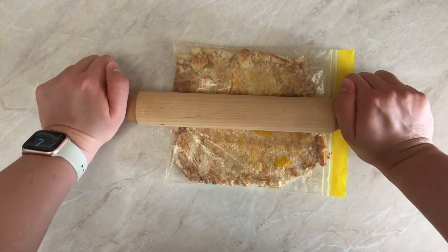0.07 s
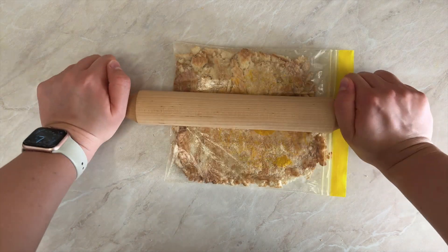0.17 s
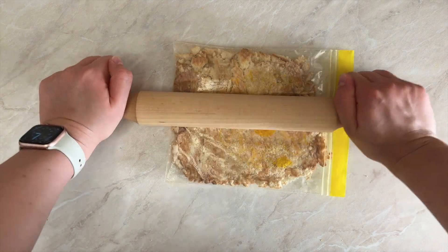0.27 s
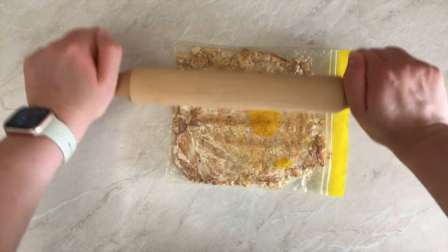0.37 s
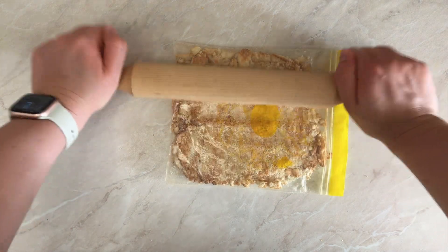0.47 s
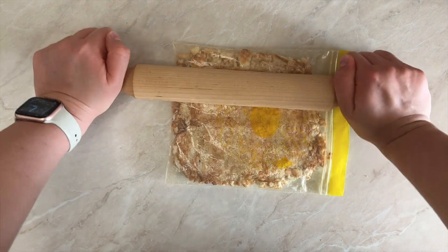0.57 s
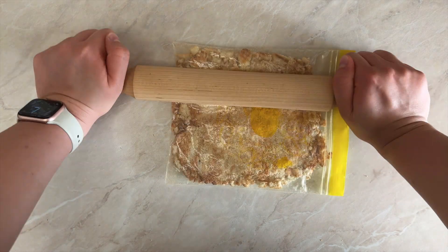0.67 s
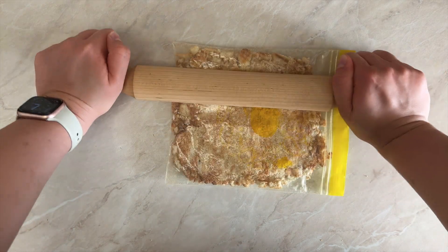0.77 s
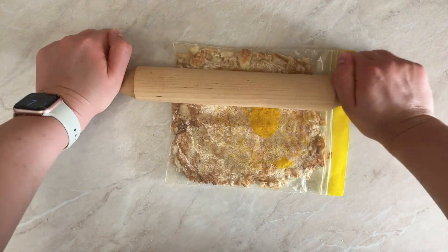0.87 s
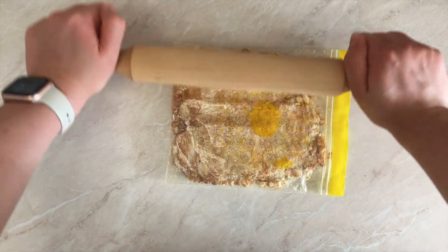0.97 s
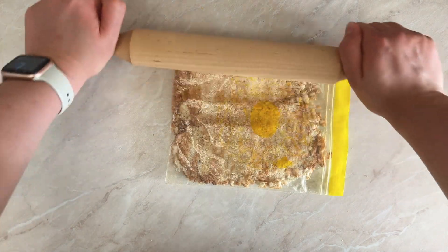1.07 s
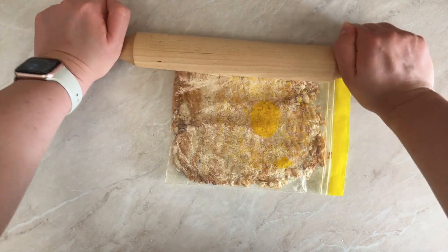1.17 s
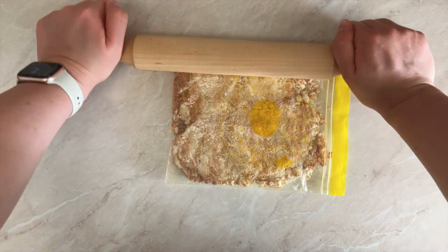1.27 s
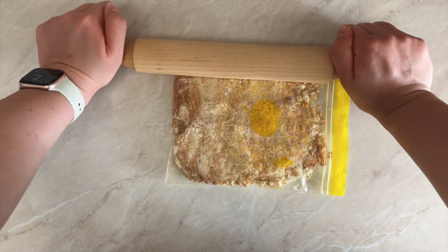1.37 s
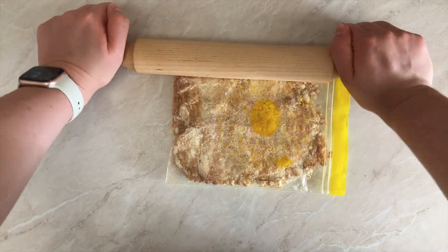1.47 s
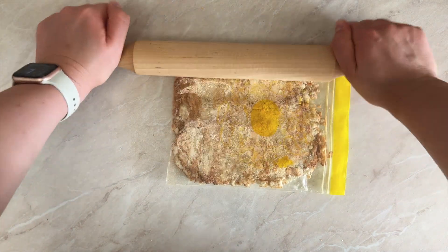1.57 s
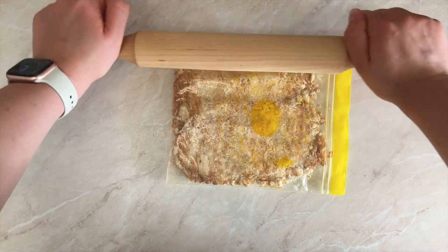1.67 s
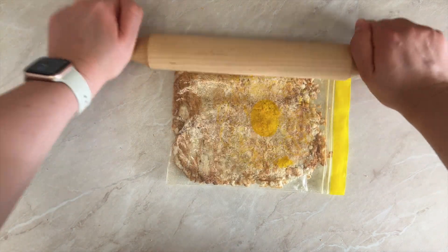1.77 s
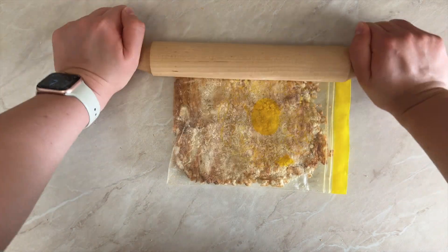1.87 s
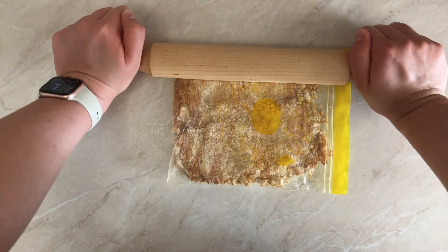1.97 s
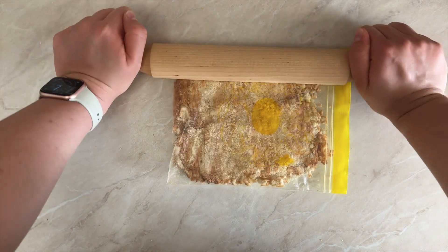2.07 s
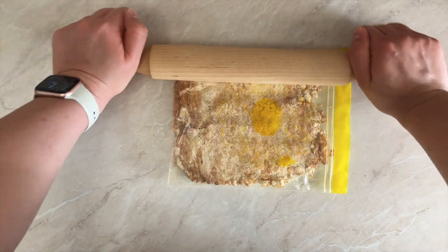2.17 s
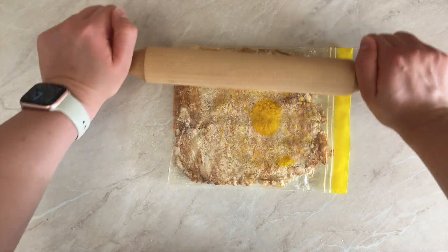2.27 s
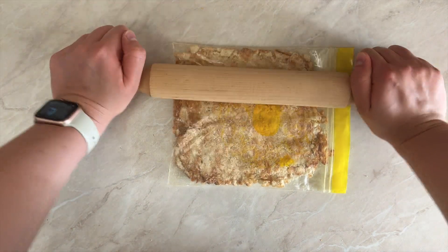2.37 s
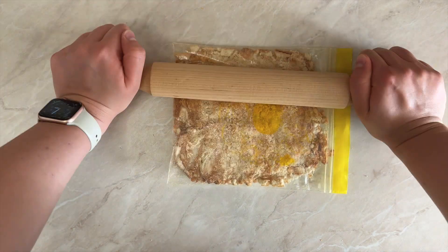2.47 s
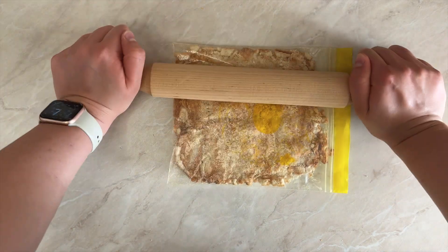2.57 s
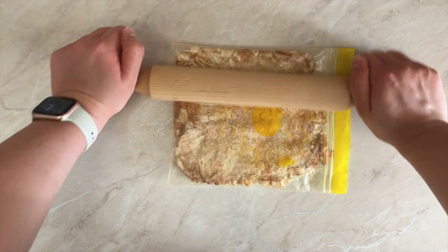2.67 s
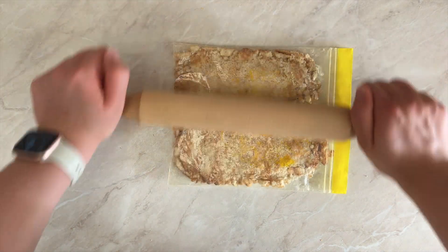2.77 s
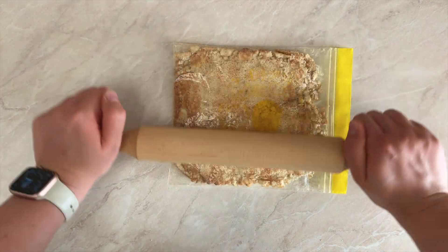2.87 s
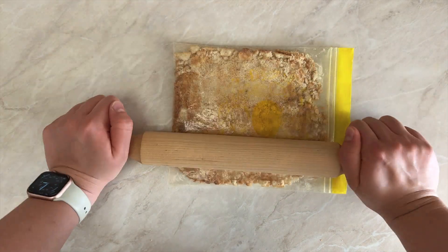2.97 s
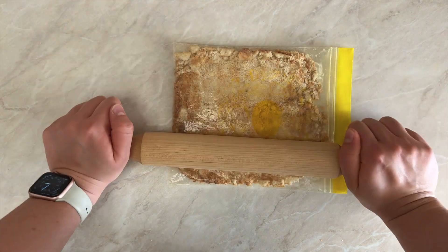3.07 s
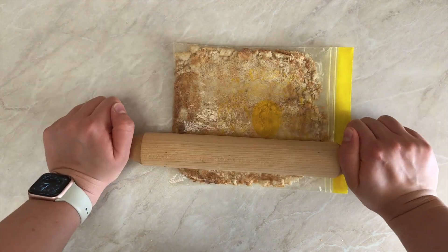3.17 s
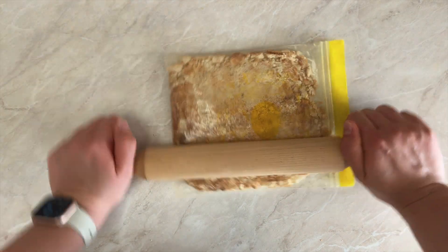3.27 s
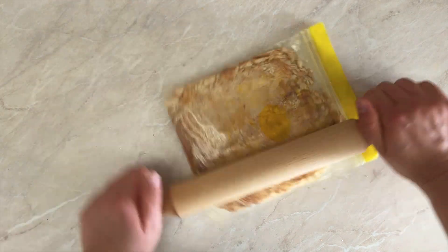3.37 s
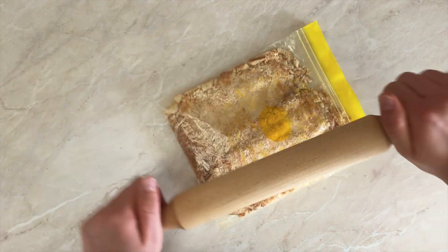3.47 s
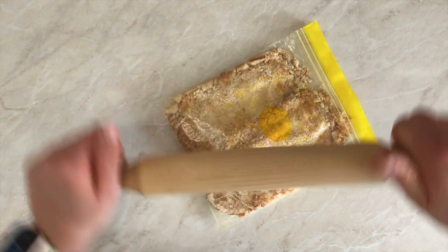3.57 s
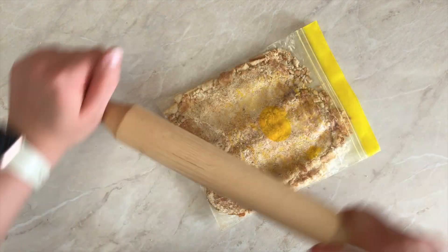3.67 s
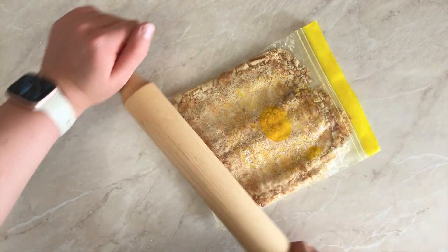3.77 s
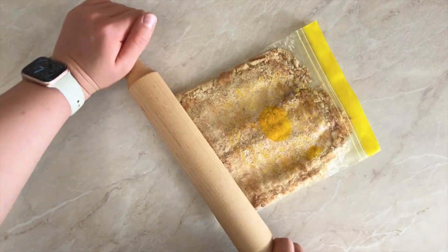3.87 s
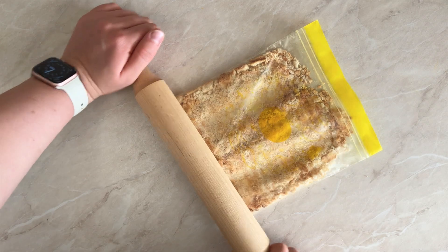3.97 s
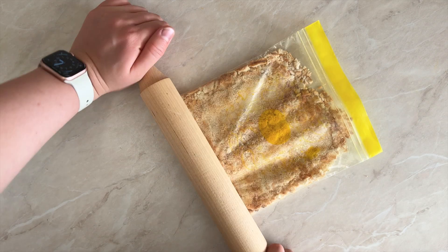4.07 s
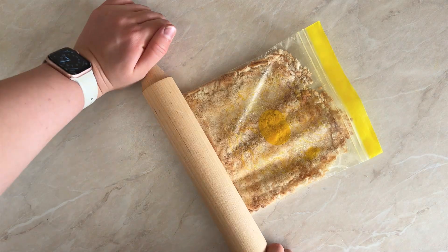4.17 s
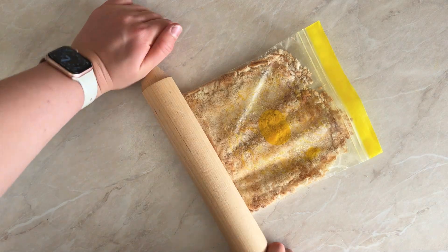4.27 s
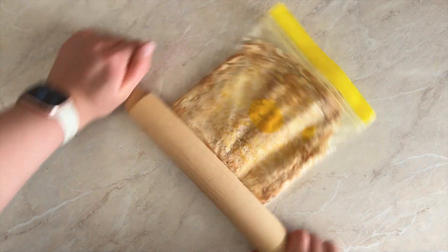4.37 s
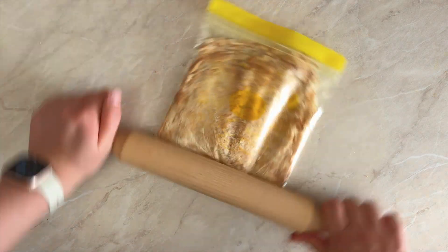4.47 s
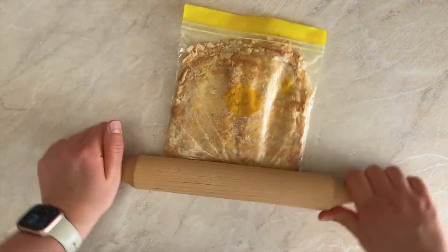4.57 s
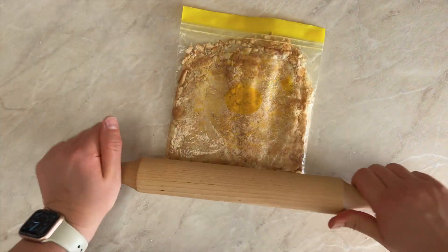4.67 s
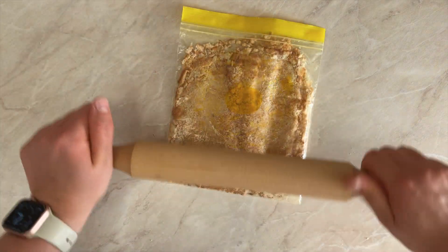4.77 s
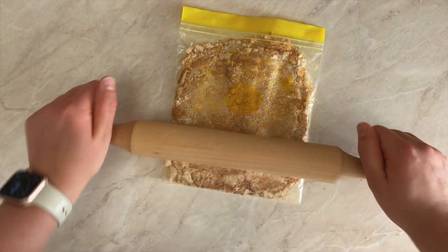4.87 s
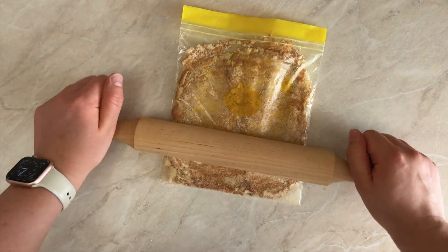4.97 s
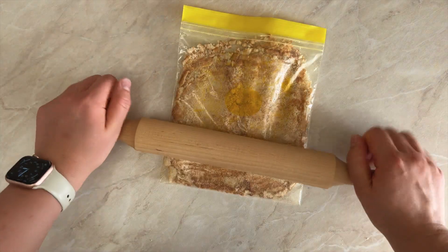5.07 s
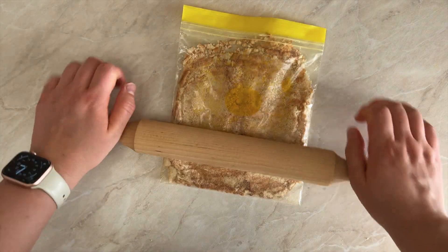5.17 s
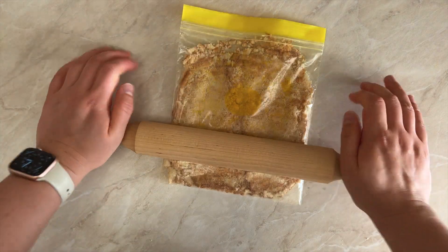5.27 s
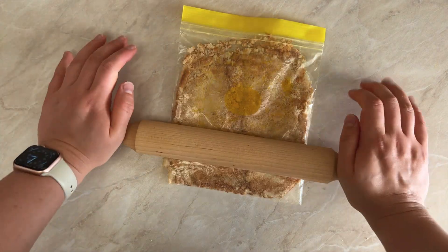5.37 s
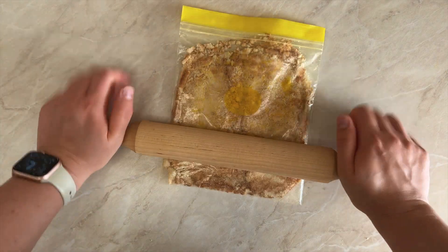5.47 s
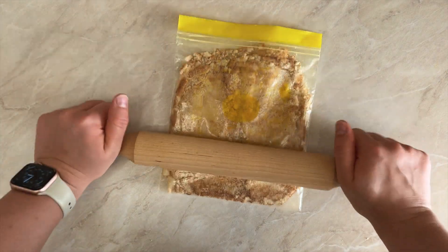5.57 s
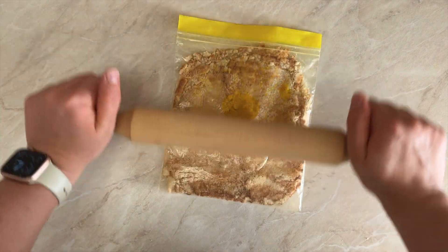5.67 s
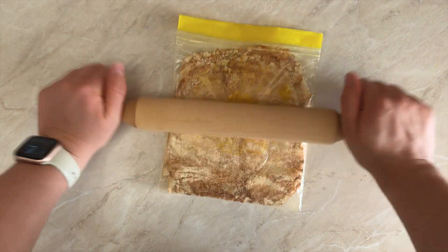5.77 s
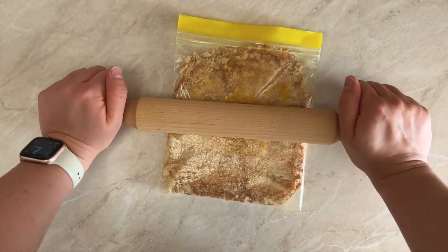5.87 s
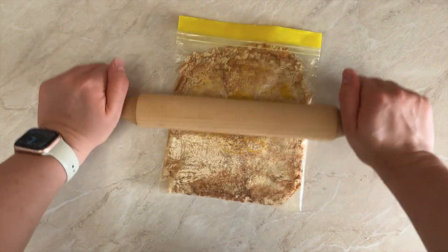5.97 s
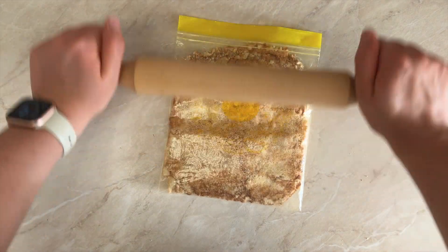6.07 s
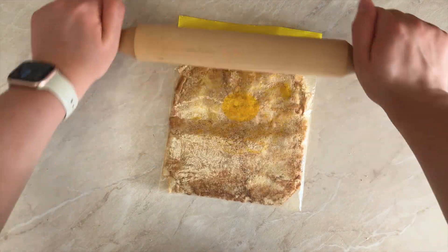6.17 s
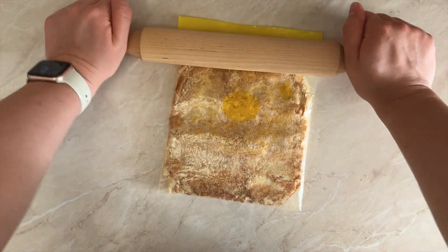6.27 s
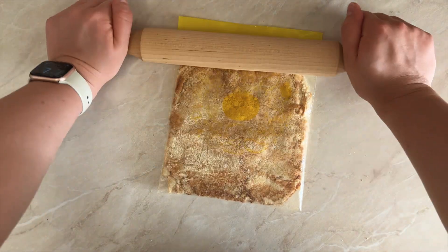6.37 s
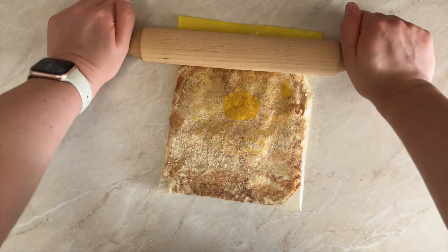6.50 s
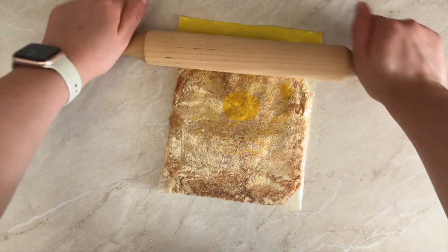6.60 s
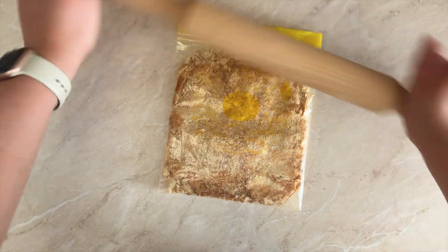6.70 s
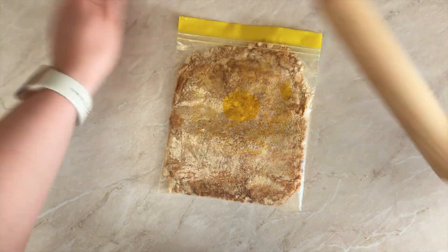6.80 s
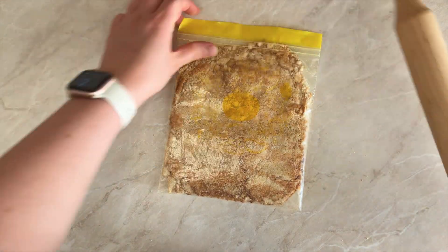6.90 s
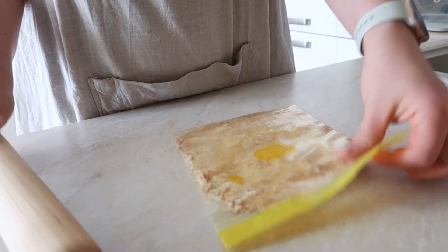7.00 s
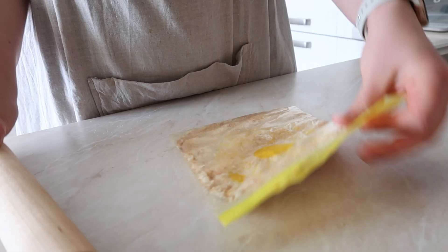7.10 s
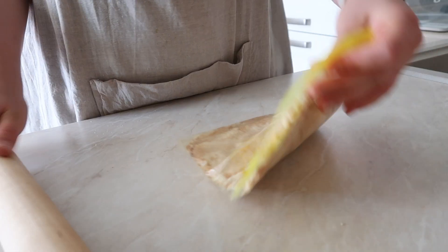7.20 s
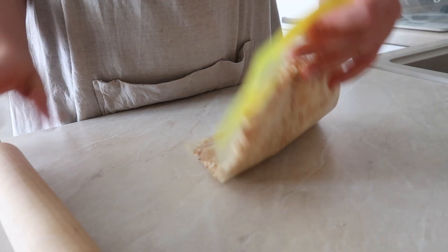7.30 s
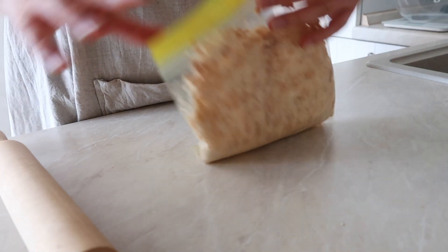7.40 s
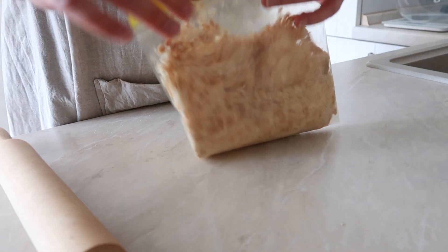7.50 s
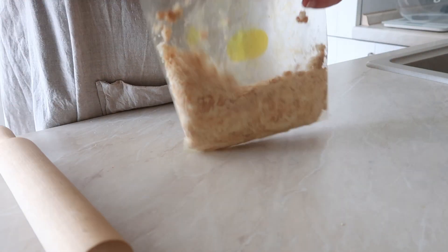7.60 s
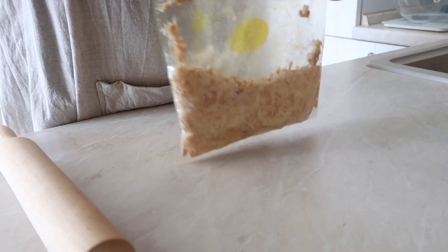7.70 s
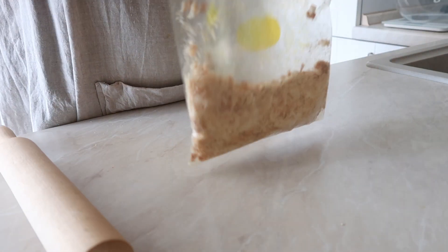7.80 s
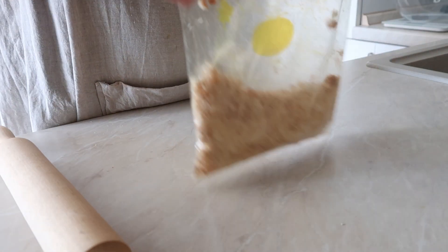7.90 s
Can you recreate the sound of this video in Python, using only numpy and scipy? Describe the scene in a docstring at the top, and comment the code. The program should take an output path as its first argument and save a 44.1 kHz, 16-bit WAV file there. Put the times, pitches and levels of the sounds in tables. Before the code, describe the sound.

In a small kitchen, heard closely, a wooden rolling pin presses crackers in a plastic bag: short bursts of gritty crunch, film crinkles and soft low thuds on the counter. One hard, dry click stands out past the middle. After a tiny dropout, the pin clatters onto the worktop, then crumbs slide in the lifted bag over a faint appliance hum.

```python
"""In a small kitchen, a wooden rolling pin crushes crackers in a plastic bag on the counter, heard from close by.
Crumbs crackle as random grains, lumps break in bursts of grains, and the pin thuds as damped sines; one sharp
click is a filtered impulse. After a brief silence the pin clatters down as ringing modes and noise.
The bag is lifted with coloured grains of sliding crumbs. An appliance hums as steady low sines over faint air noise.
"""
import sys
import numpy as np
from scipy import signal
from scipy.fft import rfft, irfft
from scipy.io import wavfile
from scipy.ndimage import uniform_filter1d

SR = 44100
rng = np.random.default_rng(int(sys.argv[2]) if len(sys.argv) > 2 else 0)


def waveform_to_disk(signal):
    """Save audio, clipped to [-1, 1], as 16-bit WAV at the path in sys.argv[1]."""
    frames = np.transpose(np.atleast_2d(signal))
    scaled = np.clip(frames, -1, 1) * 32767
    samples = np.round(scaled).astype(np.int16)
    wavfile.write(sys.argv[1], SR, samples)


N = 350154
TIME = np.arange(N) / SR


def undb(db):
    """Level to amplitude: 20 dB is a factor of ten."""
    return 10 ** (np.asarray(db) / 20)


def unit(x):
    """Normalisation to an rms of 1, equal mean power."""
    return x / np.sqrt(np.mean(x ** 2))


def ticks_of(seconds):
    """Sampled time axis of a short sound, in seconds."""
    return np.arange(int(seconds * SR)) / SR


def noise(t):
    """White noise, equal power at all frequencies, as long as the time axis t."""
    return rng.standard_normal(len(t))


def fade(t, t60):
    """Exponential decay, as of linear damping: 60 dB in t60 seconds."""
    return np.exp(-np.log(1000) * t / max(t60, 1e-4))


def add(out, s, x):
    """Superposition: mix x into out from s seconds."""
    start = max(int(s * SR), 0)
    out[start:start + len(x)] += x[:N - start]


def colour(x, points, size=2048):
    """Minimum-phase filter through (Hz, dB per Hz) points that keeps the power of white noise."""
    hz, db = np.transpose(points)
    f = np.maximum(np.fft.rfftfreq(size, 1 / SR), 1)
    target_db = np.interp(np.log(f), np.log(hz), db)
    # folding the cepstrum onto positive times makes the filter causal
    cepstrum = irfft(np.log(undb(target_db)))
    cepstrum[1:size // 2] *= 2
    cepstrum[size // 2 + 1:] = 0
    response = irfft(np.exp(rfft(cepstrum)))
    return signal.fftconvolve(x, response / np.linalg.norm(response))[:len(x)]


def ring(modes, t):
    """Modal superposition: a blow leaves a sum of damped sines, each (Hz, dB, t60 in seconds)."""
    return sum(undb(db) * fade(t, t60) * np.sin(2 * np.pi * hz * t) for hz, db, t60 in modes)


def grains(per_s, spread_db, size=N):
    """Random fractures as impulses at chance moments: many small, a few large; rms 1."""
    strength = undb(spread_db * np.minimum(rng.exponential(size=size), 5))
    sign = rng.choice([-1, 1], size)
    happens = rng.random(size) < per_s / SR
    return unit(strength * sign * happens)


def flicker(per_s):
    """Low-pass random fluctuation: smoothed random steps, per_s a second, rms 1."""
    step = int(SR / per_s)
    steps = np.repeat(rng.standard_normal(N // step + 1), step)
    return unit(uniform_filter1d(steps, step)[:N])


def flakes(x, wander_db, per_s):
    """Band modulation: flakes differ in size, so the weight shifts between half-octave bands."""
    spectrum = rfft(x)
    octave = np.log2(np.maximum(np.fft.rfftfreq(N, 1 / SR), 1))
    centres = np.arange(7, 14.6, .5)  # log2 of Hz
    out = np.zeros(N)
    for row in np.eye(len(centres)):
        band = irfft(spectrum * np.interp(octave, centres, row), N)
        out += band * undb(wander_db * flicker(per_s))
    return unit(out)


def envelope(s, attack, hold, release_db_per_s, sag_db_per_s=0):
    """Piecewise gain: a linear rise from s, a sag in dB until s + hold, then exponential release."""
    gain, t = np.zeros(N), ticks_of(1)
    fall_db = sag_db_per_s * np.minimum(t, hold) + release_db_per_s * np.maximum(t - hold, 0)
    add(gain, s, np.minimum(t / max(attack, 1e-4), 1) * undb(-fall_db))
    return gain


def snaps(per_s=90):
    """Impulsive fracture: now and then a larger crumb or a crease of the film cracks brightly; rms 1."""
    t = ticks_of(.006)
    crack = noise(t) * fade(t, 0.0035)
    single = signal.fftconvolve(grains(per_s, spread_db=2.0), crack)[:N]
    bright = [(500, -24), (1500, -5.5), (4000, 1.5), (8500, -3), (11500, -15.5), (15000, -15)]
    return unit(colour(single, bright))


def kitchen(x, wet_db, t60):
    """Diffuse reverberation: walls and cupboards return a decaying tail, weaker in the treble."""
    t = ticks_of(.6)
    tail = colour(noise(t), [(100, 1), (1500, 5.5), (4000, -2.5), (8000, -5.5), (15000, -3)])
    tail *= fade(t, t60) * (t > .004)
    return x + undb(wet_db) * signal.fftconvolve(x, tail / np.linalg.norm(tail))[:N]


# Partials of the appliance hum. Each row: frequency in Hz, level in dB.
HUM_PARTIALS = [(75.2, -0.5), (150.4, -30.5), (226, -30), (425.3, -36)]
# Spectrum of the room noise. Each row: frequency in Hz, density in dB per Hz.
AIR_SPECTRUM = [(15, -33.5), (25, -19.5), (59, -6), (91, -9), (122, -24.5), (160, -17.5), (552, -35.5),
                (741, -32), (1140, -39.5), (3720, -40), (15500, -59)]
HUM_DB, AIR_DB = -56.5, -70


def background():
    """Periodic source over broadband noise: a motor hums, its speed wandering slightly, in faint room noise."""
    turn = TIME + np.cumsum(.003 * flicker(2.6)) / SR
    # root 2 gives a sine an rms of 1
    hum = sum(np.sqrt(2) * undb(db) * np.sin(2 * np.pi * hz * turn) for hz, db in HUM_PARTIALS)
    air = colour(rng.standard_normal(N), AIR_SPECTRUM)
    return undb(HUM_DB) * hum + undb(AIR_DB) * air


# Loudness of the crumbs sliding in the lifted bag. Each row: time in seconds, level in dB.
SLIDE_LEVELS = [(7.38, -66.5), (7.644, -47.5), (7.726, -61.5), (7.744, -54), (7.766, -63.5), (7.79, -46),
                (7.87, -66), (7.898, -54), (7.94, -63)]
# Spectrum of sliding crumbs. Each row: frequency in Hz, density in dB per Hz.
SLIDE_SPECTRUM = [(88, -34), (150, -13), (326, -6.5), (366, -1), (530, -7), (722, -5), (877, -10),
                  (1910, -1.5), (2310, -4.5), (6350, -6.5), (12300, -21), (15500, -18.5)]
GRIP_S, GRIP_DB = 7.0, -63
RUSTLE_RELEASE_DB_PER_S = 243.5


def lifting():
    """Granular flow: fingers take hold of the bag, then loose crumbs run down the inside of the film."""
    grit = colour(grains(per_s=7000, spread_db=2.0), SLIDE_SPECTRUM)
    slide = flakes(grit, wander_db=1.0, per_s=65) + undb(-10.5) * snaps()
    level_db = np.interp(TIME, *np.transpose(SLIDE_LEVELS), left=-np.inf)
    grip = undb(GRIP_DB) * envelope(GRIP_S, attack=0.034, hold=0.35, release_db_per_s=RUSTLE_RELEASE_DB_PER_S)
    return slide * (undb(level_db) + grip)


# Knocks of the pin on the worktop, light as it is turned, hard when it is put down. Each row: start in seconds,
# level in dB, hardness of the contact in dB, ring of the pin in dB.
PIN_KNOCKS = [(3.587, -66, -10, 5), (3.74, -65.5, -18, -1), (7.076, -19.5, -6.5, -12),
              (7.108, -27.5, -28, -3), (7.1376, -21.5, -10.5, -11), (7.1707, -21, -15, 0.5),
              (7.192, -26.5, -13, -2), (7.2045, -20, -13.5, 3), (7.222, -25, -20, 6)]
# Bending modes of the pin. Each row: frequency in Hz, level in dB, decay time t60 in seconds.
PIN_BENDING = [(560, -13, 0.19), (645, -8, .22), (680, -3, 0.19), (770, -7, .17), (860, -6, 0.11),
               (1022, -8, .28), (1042, -7, .25), (1110, -4, .22), (1201, -12, 0.31), (1972, -9, .24),
               (2038, -2, 0.29), (3138, -5.5, 0.26), (3170, -4.5, 0.11), (4050, -27, .08),
               (5000, -14, 0.057)]
# Spectrum of the worktop's dense modes. Each row: frequency in Hz, density in dB per Hz.
WORKTOP_SPECTRUM = [(45, -25), (80, 7), (115, -1), (178, 1.5), (290, -9), (440, -2.5), (640, -2.5),
                    (1050, 0), (1350, -6.5), (1770, -20), (2050, -9.5), (2850, -27.5), (3300, -17),
                    (4500, -51), (12000, -68)]


def clatter():
    """Modal density: each knock rings the worktop's dense modes as noise, the pin's few as sines."""
    top, pin, tap, t = np.zeros(N), np.zeros(N), np.zeros(N), ticks_of(.6)
    for s, db, hard_db, ring_db in PIN_KNOCKS:
        decay = (fade(t, 0.096) + undb(-13.5) * fade(t, 0.5)) * (1 - fade(t, 0.0041))
        add(top, s, undb(db - 6.0) * noise(t) * decay)
        # the pin lands on another spot every time, which reweights its modes
        modes = [(hz, mode_db + 2 * rng.standard_normal(), t60) for hz, mode_db, t60 in PIN_BENDING]
        add(pin, s + .001 * rng.random(), undb(db + ring_db - 21.5) * ring(modes, t))
        add(tap, s, undb(db + hard_db - 2.5) * noise(t) * fade(t, 0.02))
    contact = [(800, -12), (2500, 7), (4500, -1.0), (7000, -9.0), (10000, -19.0), (15000, -32)]
    return colour(top, WORKTOP_SPECTRUM) + pin + colour(tap, contact)


# Spectrum of the click's direct sound. Each row: frequency in Hz, density in dB per Hz.
CLICK_SPECTRUM = [(150, -24), (450, -13.5), (800, 0.5), (1300, -3), (1800, 4.5), (2200, -12.5), (3200, 2.5),
                  (4300, 2), (5000, -3.5), (5900, -21), (6800, -10.5), (7700, -21.5), (9800, -24),
                  (15000, -44)]
CLICK_S, CLICK_DB = 4.7234, -5.5


def click():
    """Impulse response: one hard, dry contact at the pin's handle, a short scatter, then the room's smooth answer."""
    direct, room, t = np.zeros(N), np.zeros(N), ticks_of(.3)
    impulse = t == 0
    add(direct, CLICK_S, impulse + undb(-22.5) * noise(t) * fade(t, 0.013))
    add(room, CLICK_S, undb(-49.5) * noise(t) * fade(t, 0.35) * (t > .003))
    walls = [(200, -22.0), (900, 3.0), (3800, 0.5), (5500, -8.5), (9500, -17.5), (15000, -32)]
    return undb(CLICK_DB) * (colour(direct, CLICK_SPECTRUM) + colour(room, walls))


# Light scrapes of the pin as it is turned. Each row: start in seconds, length in seconds, level in dB.
PIN_SCRAPES = [(3.513, 0.15, -68), (3.616, 0.18, -75), (4.957, 0.29, -80), (6.792, 0.063, -78)]


def scraping():
    """Friction excitation: dry grains of slip excite the bending modes of the pin, here spectral peaks."""
    grip = np.zeros(N)
    for s, length, db in PIN_SCRAPES:
        add(grip, s, undb(db) * signal.windows.tukey(int(length * SR), .7))
    wood = [(300, -4), (900, -15), (1170, 1), (1600, -6), (2030, 2.5), (2400, -6.5), (2800, -11.5),
            (3100, 4), (3600, -10), (4600, -8), (5000, 0.0), (5700, -8), (6500, -7), (11000, -17),
            (15000, -21)]
    return grip * colour(grains(per_s=1700, spread_db=1.0), wood)


# Rolls of the pin gathering speed. Each row: start in seconds, length in seconds, level in dB,
# first pitch in Hz, last pitch in Hz.
PIN_ROLLS = [(0.337, 0.041, -58, 332, 442), (0.571, 0.048, -53, 589, 702), (3.213, 0.125, -54, 358.7, 1050),
             (4.005, 0.02, -51, 612, 700), (4.307, 0.051, -59.5, 277, 482), (4.371, .19, -61.5, 273.4, 483),
             (5.422, 0.054, -48.5, 650, 800), (7.816, 0.017, -51.5, 385, 447)]


def rolling():
    """Surface roughness: bumps pass faster as the pin speeds up, so the rumble climbs over a fixed wooden body."""
    out, second = np.zeros(N), TIME[:SR]
    rough = [(100, -24), (300, -4.0), (400, 5.5), (520, -3), (1000, -20.0), (1500, -14.5), (2500, -41.5)]
    wood = [(100, -23.5), (250, 3.5), (420, -5), (700, -29.0), (2000, -51)]
    for s, length, db, first_hz, last_hz in PIN_ROLLS:
        t = ticks_of(length)
        turns = np.cumsum(np.linspace(first_hz, last_hz, len(t))) / SR
        bumps = colour(noise(second), rough)
        # the bumps peak at 400 Hz; reading them faster raises that peak
        rumble = np.interp(turns / 400, second, bumps)
        body = colour(noise(second), wood)[-len(t):]
        mix = unit(rumble) + undb(-0.5) * unit(body)
        add(out, s, undb(db - 5) * mix * signal.windows.tukey(len(t), .35))
    return out


# The cook's weight landing on the counter. Each row: start in seconds, level in dB.
WEIGHT_LANDINGS = [(.46, -48.5), (1.776, -42.5), (2.902, -52.5), (3.905, -46.5), (5.756, -46),
                   (6.228, -47.5)]


def counter():
    """Forced low-frequency vibration: the whole counter shudders when weight lands on it."""
    push, t = np.zeros(N), ticks_of(0.47)
    for s, db in WEIGHT_LANDINGS:
        add(push, s, undb(db) * fade(t, 0.49) * (1 - fade(t, 0.027)))
    shudder = [(20, -9.5), (38, -3.0), (55, -4), (100, 0), (170, -7.5), (300, -25), (900, -55.0)]
    return push * colour(rng.standard_normal(N), shudder)


# Drops of the pin off a lump onto the worktop. Each row: start in seconds, level in dB, pitch in Hz.
PIN_DROPS = [(0.351, -51, 277), (0.534, -46, 264), (1.121, -33.5, 387), (1.129, -32, 397),
             (1.164, -36, 274), (1.187, -30.5, 309), (1.775, -22, 250), (1.797, -33.5, 188),
             (2.383, -35, 412), (2.555, -55, 453), (2.903, -43.5, 238), (3.218, -41.5, 427),
             (3.905, -39.5, 215), (4.314, -52, 277), (4.39, -47, 298), (5.425, -39, 426), (5.466, -38, 260),
             (5.748, -46, 248), (6.227, -32.5, 238), (6.815, -49.5, 271)]
# Modes of the cupboard under the worktop. Each row: frequency in Hz, level in dB, decay time t60 in seconds.
CUPBOARD_RESONANCES = [(177.9, -1.5, .26), (296, -10, 0.4), (396.7, -11, 0.28), (457, -14, .33)]


def thuds():
    """Contact resonance: cushioned blows ring a few cycles; the deeper they are, the more the cupboard rings."""
    out, t = np.zeros(N), ticks_of(0.36)
    cupboard = ring(CUPBOARD_RESONANCES, t) * (1 - fade(t, 0.079))
    for s, db, hz in PIN_DROPS:
        contact = [(.75 * hz, -12, .04), (hz, 0, .034), (1.3 * hz, -10, .03)]
        blow = ring(contact, t) * (1 - fade(t, .034))
        add(out, s, undb(db + 7.5) * blow + undb(db - 11.0) * (200 / hz) ** 2 * cupboard)
    return out


# Lumps collapsing in a quick run of cracks. Each row: start in seconds, time to the peak in seconds, level in dB.
LUMP_BREAKS = [(.444, 0.0091, -45.5), (1.765, 0.0036, -42.5), (2.32, 0.0054, -47), (2.4295, 0.0036, -50),
               (2.553, .003, -55), (2.634, 0.0085, -48.5), (2.886, 0.0064, -49), (3.894, 0.0046, -43.5),
               (4.884, 0.0095, -54.5), (5.308, 0.0038, -47), (5.742, 0.0079, -43.5), (5.929, 0.0062, -54.5),
               (6.216, 0.0055, -39.5), (7.777, .008, -53)]
# Single ticks of creasing film and flakes. Each row: start in seconds, level in dB.
SINGLE_TICKS = [(0.731, -46.5), (1.3642, -45), (1.3994, -46.5), (1.525, -47), (1.9545, -59), (2.5945, -52),
                (5.2888, -38), (7.441, -46), (7.745, -39)]
# Spectrum of crisp fracture, in lumps and crumbs. Each row: frequency in Hz, density in dB per Hz.
CRISP_SPECTRUM = [(500, -25), (1200, -3), (2000, -1), (3500, -1), (5000, -4), (7500, -7), (9500, -10.5),
                  (12000, -22.5), (15500, -13)]
# Spectrum of snapping or creasing film. Each row: frequency in Hz, density in dB per Hz.
FILM_SPECTRUM = [(600, -41), (2000, -3), (4500, 8), (8500, 6), (15000, -19)]


def cracks():
    """Brittle failure: a lump breaks in a swelling, then dying run of fractures; a crease or flake ticks once."""
    lumps, ticks, t = np.zeros(N), np.zeros(N), ticks_of(0.064)
    for s, rise, db in LUMP_BREAKS:
        swell = t / rise * np.exp(1 - t / rise)
        add(lumps, s, undb(db) * grains(per_s=7600, spread_db=1.5, size=len(t)) * swell)
    for s, db in SINGLE_TICKS:
        add(ticks, s, undb(db - 3) * noise(t) * fade(t, 0.0063))
    return colour(lumps, CRISP_SPECTRUM) + colour(ticks, FILM_SPECTRUM)


# Strokes of the pin bearing down on the crumbs. Each row: start in seconds, attack in seconds,
# hold from the start in seconds, crisp crackle in dB, dull grinding in dB.
PIN_STROKES = [(0.0, 0.0033, 0.037, -54, -52.5), (0.441, .01, 0.17, -56, -53),
               (1.085, 0.026, 0.2, -50.5, -50.5), (1.754, 0.023, 0.027, -57.5, -53.5),
               (1.855, 0.026, .04, -58.5, -57.5), (2.313, 0.014, 0.12, -55, -53),
               (2.623, .008, 0.0092, -53.5, -63), (2.881, .015, 0.088, -58.5, -55.5),
               (3.235, .035, 0.092, -64.5, -59), (3.886, 0.014, 0.019, -53, -51),
               (3.958, 0.027, 0.049, -59, -55.5), (4.232, 0.036, 0.28, -62.5, -62.5),
               (4.871, 0.03, 0.032, -58.5, -60.5), (5.215, .018, 0.064, -53, -52.5),
               (5.41, .006, 0.1, -58, -63.5), (5.735, 0.015, 0.012, -48, -47),
               (6.211, 0.0082, 0.032, -53, -51)]
# Rustles of the bag as the pin eases off or shifts. Each row: start in seconds, rise in seconds, level in dB.
BAG_RUSTLES = [(.21, 0.036, -63.5), (.812, 0.0033, -62.5), (.845, 0.018, -79), (1.35, 0.015, -73),
               (1.489, 0.032, -61.5), (2.126, 0.018, -60), (3.17, 0.03, -69.5), (4.08, 0.029, -60.5),
               (4.56, 0.028, -70), (5.11, 0.048, -65.5), (6.3, 0.042, -66.5), (6.37, 0.031, -70.5),
               (6.516, 0.021, -65.5), (6.765, 0.053, -65), (6.86, 0.014, -70.5), (6.922, .02, -58.5)]
# Spectrum of the dull grinding. Each row: frequency in Hz, density in dB per Hz.
GRIND_SPECTRUM = [(60, -14), (130, -3.5), (230, 7.5), (330, -3), (430, 2.5), (540, -8.5), (660, 2),
                  (850, -6), (1100, -3), (1450, -3.5), (2100, -8), (3200, -25), (6000, -26.5)]
CRISP_RELEASE_DB_PER_S, GRIND_RELEASE_DB_PER_S = 122.5, 144.5
PRESS_SAG_DB_PER_S = 13  # the crumbs settle a little while the weight stays on
SNAP_DB, RUSTLE_GRIND_DB = -11, -5  # snaps and grinding against the crisp crackle


def crushing():
    """Fracture noise by two paths: crisp in the air, dull through the packed layer and the worktop."""
    crackle = colour(grains(per_s=7000, spread_db=2.0), CRISP_SPECTRUM)
    crisp = flakes(crackle, wander_db=2.5, per_s=79) + undb(SNAP_DB) * snaps()
    grind = flakes(colour(grains(per_s=1300, spread_db=2.0), GRIND_SPECTRUM), wander_db=4, per_s=70)
    out = np.zeros(N)
    for s, attack, hold, crisp_db, grind_db in PIN_STROKES:
        crisp_gain = envelope(s, attack, hold, CRISP_RELEASE_DB_PER_S, PRESS_SAG_DB_PER_S)
        grind_gain = envelope(s, attack, hold, GRIND_RELEASE_DB_PER_S, PRESS_SAG_DB_PER_S)
        out += undb(crisp_db) * crisp * crisp_gain
        out += undb(grind_db) * grind * grind_gain
    rustle = sum(undb(db) * envelope(s, rise, rise, RUSTLE_RELEASE_DB_PER_S) for s, rise, db in BAG_RUSTLES)
    return out + rustle * (crisp + undb(RUSTLE_GRIND_DB) * grind)


def scene():
    """Superposition of all sources, the crumbs and the blows each with their own reverberation."""
    blows = kitchen(clatter() + rolling() + counter() + thuds(), wet_db=-14, t60=0.31)
    crumbs = kitchen(lifting() + scraping() + cracks() + crushing(), wet_db=-16, t60=0.35)
    return (background() + click() + blows + crumbs)[None]


# The brief silence: its start in seconds, its end in seconds.
SILENT_SPAN = (6.961, 7.001)
TOP_HZ = 15900


def record(dry):
    """Gating and low-pass filtering: the sound drops out for a moment; the top is cut."""
    live = (TIME < SILENT_SPAN[0]) | (TIME > SILENT_SPAN[1])
    low_pass = signal.ellip(10, .2, 70, TOP_HZ, fs=SR, output="sos")
    return signal.sosfilt(low_pass, dry * live)


dry = scene()
out = record(dry)
waveform_to_disk(out)
```